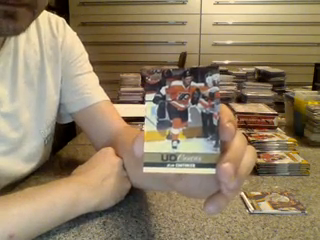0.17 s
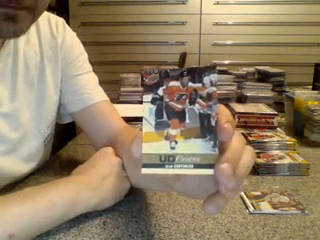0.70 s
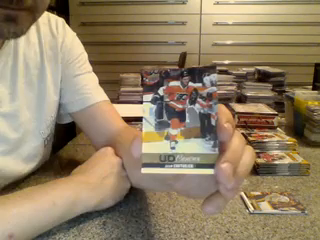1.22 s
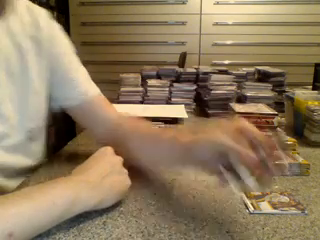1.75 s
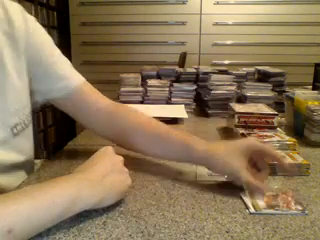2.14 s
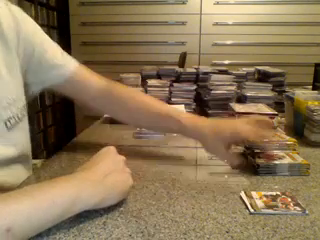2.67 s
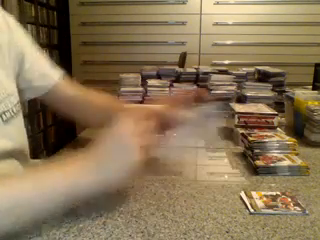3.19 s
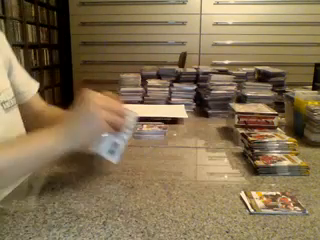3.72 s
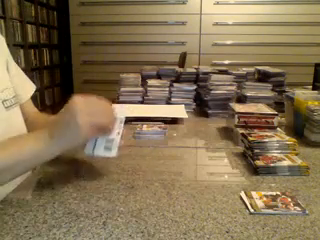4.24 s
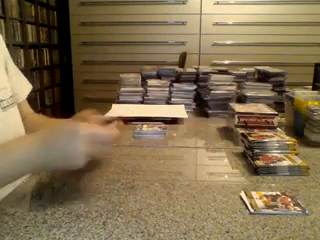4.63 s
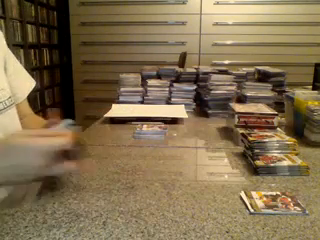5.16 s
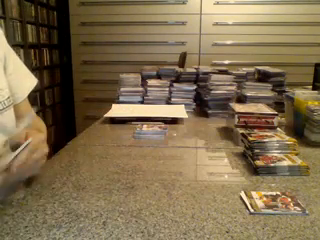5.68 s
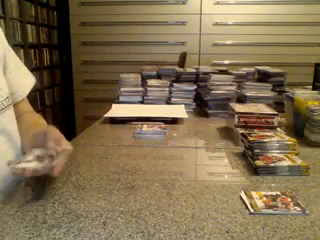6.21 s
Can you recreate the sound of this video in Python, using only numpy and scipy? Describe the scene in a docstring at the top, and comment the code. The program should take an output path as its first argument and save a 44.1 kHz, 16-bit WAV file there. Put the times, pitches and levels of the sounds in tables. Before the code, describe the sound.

A quiet hum runs throughout. Soft contacts of fingers and card, a barely audible cloth swish and a light low landing on a stack lead into plastic sleeve handling: sparse clicks, growing crackle, one strong pop, a cluster of crisp snaps, then softer sliding, a muted bump and last crinkles. Small room with short echoes, simple microphone with little extreme treble.

```python
"""Small room, fan humming steadily: a card is laid down, a thin plastic sleeve is pried open, the card slid in.
Film: filtered noise bursts for the sharp snaps, random short pings over a hiss for the crackling rustle.
Fingers and card: decaying sines and noise scuffs; the landing adds a low ring and a noise crack.
Arm: filtered noise swishes. Fan: sines and filtered noise. Separately, a faint airy band of noise fades early.
Random echoes answer the handling; a steep low-pass ends the chain."""
import sys
import numpy as np
from scipy import signal
from scipy.fft import rfft, irfft, next_fast_len
from scipy.io import wavfile
from scipy.ndimage import uniform_filter1d, map_coordinates

SR = 44100
rng = np.random.default_rng(int(sys.argv[2]) if len(sys.argv) > 2 else 0)


def file_out(sig):
    """Save sig as 16-bit WAV at sys.argv[1]."""
    # one column per channel
    cols = np.atleast_2d(sig).T
    # limit, then scale
    lim = np.clip(cols, -1, 1)
    pcm = np.round(lim * 32767).astype(np.int16)
    wavfile.write(sys.argv[1], SR, pcm)


N = 280917

# All levels are relative unless marked rms.
# fan air colour: (frequency [Hz], gain [dB])
FAN_AIR = [(40, -7.5), (120, 2.5), (220, -4), (400, -9.5), (700, -9), (1200, -6), (2000, -16.5),
           (2500, -15), (3000, -21.5), (6500, -26.5)]
HUM_HZ, HUM_RMS_DB = 90.1, -47
BLADE_HZ = 160.4
# blade tone and its overtones, in order: (level [dB rms])
BLADE_RMS_DB = [-68, -81, -81, -77.5, -81, -81]

# soft contacts of fingers and card: (time [s], level [dB], card ring re contact [dB])
KNOCKS = [(0.277, -59, 3.5), (0.605, -43.5, -2.5), (0.978, -60.5, -1), (1.436, -65.5, 24.5),
          (1.933, -56, -0.5), (2.34, -50.5, -1), (4.889, -45, -8.5), (5.864, -34.5, -8)]
# thud modes of hand and table: (multiple of THUD_HZ [ratio], level [dB], t60 [s])
THUD_MODES = [(.48, -8, 0.14), (1, 2.5, 0.073), (1.35, -15, 0.058)]
THUD_HZ = 273.3
# stiff card modes: (frequency [Hz], level [dB], t60 [s])
CARD_MODES = [(730, -3.5, 0.046), (1290, 3, 0.03), (1587, 6, 0.032)]

# arm reaches out and comes down: (start [s], length [s], level [dB])
SWEEPS = [(1.4, .005, -64.5), (1.493, 0.031, -64), (1.659, 0.14, -61.5), (1.905, 0.048, -72)]
SWEEP_ATTACK_S, SWEEP_RELEASE_S = 0.011, 0.041
# shirt cloth resonances: (centre [Hz], width [Hz], gain [dB])
CLOTH_PEAKS = [(1290, 130, -12), (2534, 430, -2.5), (3500, 550, 0), (5600, 1060, -2)]

# film or card edge buckles: (time [s], level [dB], facet pitch [Hz], focus, sign ignored [dB/octave^2])
SNAPS = [(1.427, -42.5, 2750, 2.5), (2.612, -54.5, 2430, 11), (2.71, -38.5, 3400, 3.5),
         (2.8885, -42.5, 6200, 1), (3.03, -42, 6110, 3.5), (3.172, -40.5, 6110, 8),
         (3.201, -38.5, 3200, 4.5), (3.278, -42, 806, 1.5), (3.327, -37.5, 3500, 4),
         (3.601, -35.5, 3640, 17), (3.637, -38, 3470, 2), (3.7665, -37, 5440, 2), (3.834, -40, 3860, 11),
         (3.9065, -38.5, 5000, 14), (3.9445, -28, 3600, 3.5), (4.0455, -27.5, 5370, 1),
         (4.0695, -28.5, 5100, 1), (4.133, -34.5, 3640, -1), (4.228, -12, 1150, -1), (4.2335, -17, 3150, 3),
         (4.3608, -21, 3140, 8.5), (4.477, -22.5, 1500, -1.5), (4.486, -24.5, 2980, 2.5),
         (4.505, -18, 1300, 3), (4.518, -18.5, 570, 3), (4.5425, -25.5, 2360, 9), (4.706, -26, 3530, 0.5),
         (4.73, -34, 660, -1.5), (4.746, -30, 925, 0), (4.8248, -28.5, 1290, 4.5),
         (4.889, -31.5, 4390, 3.5), (4.8945, -33, 4000, 3.5), (4.97, -34, 980, -1), (5.065, -35.5, 4140, 6),
         (5.102, -38, 4220, 19), (5.126, -37.5, 4370, 1.5), (5.156, -35.5, 1000, -0.5),
         (5.206, -33.5, 3930, 1.5), (5.246, -37, 2800, 3), (5.274, -33.5, 640, 2.5),
         (5.376, -37.5, 2650, 6.5), (5.538, -46, 3600, 10), (5.566, -35, 654, -3.5),
         (5.592, -34.5, 3140, 2.5), (5.649, -40.5, 3480, 1.5), (5.661, -40.5, 3500, 4),
         (5.695, -41, 4950, 1), (5.863, -30, 422, 3), (6.15, -43, 2680, 7), (6.188, -34.5, 2940, 5.5),
         (6.219, -35.5, 2920, 2.5), (6.251, -39.5, 3070, 4.5)]
# colour of the film's snaps and rustle: (frequency [Hz], gain [dB])
FILM_COLOUR = [(170, -42.5), (260, -22), (480, -15), (700, -7.5), (850, -12), (1160, -0.5), (1600, -8.5),
               (4050, -7), (4600, -16.5), (5500, -8), (6500, -20.5)]
# rustle registers, flexing card, sheet body, crisp edge: (low [Hz], high [Hz])
REGISTERS = [(220, 900), (900, 2200), (2200, 7600)]

# card and fingers slide on film: (start [s], length [s], level [dB], card flexing [dB])
STROKES = [(1.437, 0.006, -54.5, -29), (1.471, 0.0023, -56, -7), (2.655, 0.054, -45.5, -32),
           (2.897, 0.011, -53, -16), (3.131, 0.01, -57, -46), (3.2, 0.015, -44.5, -53),
           (3.273, 0.011, -45, -11.5), (3.573, 0.079, -58.5, -23), (3.919, 0.14, -44, -29),
           (4.025, 0.023, -40.5, -28), (4.142, 0.062, -35.5, -29), (4.229, 0.0057, -20.5, -21),
           (4.436, 0.055, -35.5, -8), (4.485, 0.04, -26, -5.5), (4.638, 0.015, -39.5, -18),
           (4.728, 0.024, -31, -5), (4.876, 0.017, -46, 1.5), (5.178, 0.094, -39, -5),
           (5.39, 0.035, -51, -1), (5.565, 0.044, -48, -1.5), (5.681, 0.08, -47.5, -8.5),
           (5.849, 0.031, -48, -4), (6.21, 0.014, -51.5, -7)]
STROKE_ATTACK_S, STROKE_RELEASE_S = 0.0079, 0.019
# firmness of the held sleeve: (time [s], rustle level [dB])
HOLD = [(2.621, -66.5), (2.799, -58.5), (3.101, -66.5), (3.33, -60.5), (3.52, -73), (3.661, -56),
        (3.881, -59), (4.051, -49), (4.621, -48), (5.051, -51.5), (5.51, -58), (5.72, -62.5), (6.02, -70.5),
        (6.14, -54), (6.36, -61.5)]
HOLD_FLEX_DB = -11.5
# small facets give way at random while the film is rubbed
TICKS_PER_S, TICK_RE_RUB_DB, TICK_SPREAD_DB = 33, 5, 1.5
TICK_LIMIT_DB = -47.5  # before the spread
TICK_HZ, TICK_SPREAD_OCTAVES, TICK_FOCUS_DB_PER_OCTAVE2 = 3600, 0.65, 4

LANDING_S, LANDING_RISE_S = 2.1858, 0.018
# low ring of the landing: (level [dB], frequency [Hz], t60 [s])
LANDING_RING = (-44.5, 190, 0.18)
# stack resonances in the clack: (centre [Hz], width [Hz], gain [dB])
STACK_PEAKS = [(650, 190, -1.5), (1141, 320, -0.5), (2070, 240, -1.5), (3240, 960, -13.5),
               (5870, 910, -12.5)]

# room decay: (frequency [Hz], t60 [s])
ROOM_DECAY = [(200, 0.4), (600, 0.18), (1500, 0.28), (6000, 0.18)]
MIC_TOP_HZ = 6600


def amp(db):
    """Decibels to gain."""
    return 10 ** (np.asarray(db) / 20)


def unit(x):
    """x scaled to rms 1."""
    return x / np.sqrt(np.mean(x ** 2) + 1e-20)


def along(points, hz):
    """Interpolate (Hz, value) points on a log frequency axis."""
    f, v = np.transpose(points)
    return np.interp(np.log(hz + 1), np.log(f + 1), v)


def peaks(rows, hz):
    """Summed gain of resonances (centre Hz, width Hz, dB)."""
    return sum(amp(db) / (1 + (2 * (hz - centre) / width) ** 2) for centre, width, db in rows)


def wobble(knots_per_s):
    """Smooth random curve through normal random knots."""
    knots = rng.standard_normal(int(N * knots_per_s / SR) + 4)
    return map_coordinates(knots, [np.arange(N) * knots_per_s / SR])


def coloured(x, gain):
    """Filter x by gain(hz), minimum phase through the folded cepstrum."""
    size = 2 * next_fast_len(len(x) // 2 + 2048)
    log_gain = np.log(np.maximum(gain(np.fft.rfftfreq(size, 1 / SR)), 1e-6))
    cepstrum = irfft(log_gain)
    cepstrum[1:size // 2] *= 2
    cepstrum[size // 2 + 1:] = 0
    return irfft(rfft(x, size) * np.exp(rfft(cepstrum)))[:len(x)]


def add(track, s, sound):
    """Mix sound into track at s seconds."""
    part = track[round(s * SR):][:len(sound)]
    part += sound[:len(part)]


def swell(s, length_s, attack_s, release_s):
    """Gain of one movement: rises until s, holds for its length, dies away."""
    t = np.arange(N) / SR - s
    return np.exp(np.minimum(t, 0) / attack_s - np.maximum(t - length_s, 0) / release_s)


def shifting(x, patchy_db=3):
    """Bending sheets keep changing resonances: x with time-frequency patches of random gain, rms 1."""
    z = signal.stft(x, nperseg=512)[2]
    field = uniform_filter1d(rng.standard_normal(z.shape), size=6, axis=0)
    field = uniform_filter1d(field, size=6, axis=1)
    return unit(signal.istft(z * amp(patchy_db * unit(field)), nperseg=512)[1][:N])


def fan(air_rms_db=-70, drift_rad=.05):
    """Steady hum and weak blade tones, as sines of slightly drifting phase, over a soft rush of air noise."""
    # drift_rad is the phase drift at HUM_HZ
    turn = 2 * np.pi * np.arange(N) / SR + drift_rad * wobble(5.4) / HUM_HZ
    lines = [(HUM_HZ, HUM_RMS_DB)]
    lines += [(BLADE_HZ * k, db) for k, db in enumerate(BLADE_RMS_DB, 1)]
    tones = sum(np.sqrt(2) * amp(db) * np.sin(hz * turn) for hz, db in lines)
    air = unit(coloured(rng.standard_normal(N), lambda hz: amp(along(FAN_AIR, hz))))
    return tones + amp(air_rms_db) * air


def airy_band(centre_hz=2540, width_hz=220, level_db=-77, hold_s=0.23, release_s=0.12):
    """Faint airy whistle, a narrow band of noise, heard at first and then fading."""
    band = lambda hz: 1 / np.hypot(1, 2 * (hz - centre_hz) / width_hz)
    air = unit(coloured(rng.standard_normal(N), band))
    return amp(level_db) * swell(0, hold_s, release_s, release_s) * air


def knocks(thud_db=-3, card_db=-6, scuff_t60_s=0.016, scuff_rise_s=0.0093, attack_s=0.0043):
    """Fingertip scuff swells into a soft contact, thuds in hand and table and excites the card's modes."""
    out, t = np.zeros(N), np.arange(SR // 5) / SR
    lead_s = 3 * scuff_rise_s  # scuff starts this long before contact
    mode = lambda hz, db, t60_s: amp(db - 60 * t / t60_s) * np.sin(2 * np.pi * hz * t)
    card = sum(mode(*row) for row in CARD_MODES)
    thud = sum(mode(THUD_HZ * multiple, db, t60_s) for multiple, db, t60_s in THUD_MODES)
    thud *= 1 - np.exp(-t / attack_s)
    rise = np.exp(np.minimum(t - lead_s, 0) / scuff_rise_s)
    scuff_gain = np.minimum(rise, amp(-60 * (t - lead_s) / scuff_t60_s))
    for s, db, ring_db in KNOCKS:
        scuff = rng.standard_normal(len(t)) * scuff_gain
        ring = signal.fftconvolve(card, scuff / np.linalg.norm(scuff))
        add(out, s, amp(db + thud_db) * thud)
        add(out, s - lead_s, amp(db + ring_db + card_db) * ring)
    return out


def swish(flutter_db=1.9, patchy_db=5.0):
    """Shirt cloth brushes as the arm moves: resonant noise whose colour drifts with the folds."""
    motion = sum(amp(db) * swell(s, length_s, SWEEP_ATTACK_S, SWEEP_RELEASE_S)
                 for s, length_s, db in SWEEPS)
    cloth = unit(coloured(rng.standard_normal(N), lambda hz: peaks(CLOTH_PEAKS, hz)))
    return motion * amp(flutter_db * wobble(51.0)) * shifting(cloth, patchy_db)


def snaps(rows, crack_t60_s=0.012, ring_db=5, ring_sharpness=6, flutter_db=-21, flutter_t60_s=0.093,
          attack_s=0.00023, level_db=-2.44):
    """Film facet pops through: a noise crack peaked at its own pitch, then the sheet flutters."""
    out, t = np.zeros(N), np.arange(SR // 12) / SR
    decay = amp(-60 * t / crack_t60_s) + amp(flutter_db - 60 * t / flutter_t60_s)
    envelope = decay * (1 - np.exp(-t / attack_s))
    for s, db, facet_hz, focus_db in rows:
        # small facets radiate treble, large ones the middle
        octaves = lambda hz: np.log2((hz + 1) / facet_hz)
        peak_db = lambda hz: ring_db / (1 + (ring_sharpness * octaves(hz)) ** 2)
        facet_gain_db = lambda hz: peak_db(hz) - abs(focus_db) * octaves(hz) ** 2
        gain = lambda hz: amp(along(FILM_COLOUR, hz) + facet_gain_db(hz)) * microphone(hz)
        snap = coloured(rng.standard_normal(len(t)) * envelope, gain)
        onset_rms = np.std(snap[:round(.006 * SR)])
        add(out, s, amp(db + level_db) * snap / onset_rms)
    return out


def handling():
    """Strokes add in power to the held sleeve's rustle; returns level and power-weighted card flexing, dB."""
    hold_db = np.interp(np.arange(N) / SR, *np.transpose(HOLD), left=-140)
    power = amp(hold_db) ** 2
    flexing = HOLD_FLEX_DB * power
    for s, length_s, db, flex_db in STROKES:
        stroke = (amp(db) * swell(s, length_s, STROKE_ATTACK_S, STROKE_RELEASE_S)) ** 2
        power = power + stroke
        flexing = flexing + flex_db * stroke
    return 10 * np.log10(power), flexing / power


def creases(per_s, spread_db, life_cycles):
    """Countless tiny creases, each a short ping of random pitch and size; rms 1."""
    chance = rng.random((int(per_s * N / SR), 3))
    start = (chance[:, :1] * N).astype(int)
    hz = 350 * (7000 / 350) ** np.sqrt(chance[:, 1:2])
    size = amp(spread_db * np.minimum(-np.log(1 - chance[:, 2:]), 2.5))
    age = np.arange(SR // 90)
    cycles = hz * age / SR
    decay = amp(-60 * cycles / life_cycles)  # -60 dB after life_cycles
    pings = size * np.sqrt(hz) * np.sin(2 * np.pi * cycles) * decay
    return unit(np.bincount((start + age).ravel(), pings.ravel(), N)[:N])


def sleeve(x, low_hz, high_hz):
    """What one register of the sleeve radiates when x shakes it, rms 1."""
    band = lambda hz: 1 / np.sqrt((1 + (low_hz / (hz + 1)) ** 8) * (1 + (hz / high_hz) ** 8))
    return unit(coloured(x, lambda hz: amp(along(FILM_COLOUR, hz)) * band(hz)))


def rustle(level_db, flex_db, creases_per_s=300, spread_db=4.0, life_cycles=5, friction=0.77, grip_db=3.5,
           card_db=-4.0, body_db=-5.0, edge_db=-6.5, darken=0.13, touch_db=-66, firm_db=-46):
    """Creases let go at random over the hiss of card sliding on film; the grip tightens and eases."""
    # a light touch only hisses, a firm one crackles
    pressure = np.interp(level_db, [touch_db, firm_db], [0, 1])
    crackle = pressure * creases(creases_per_s, spread_db, life_cycles)
    hiss = friction * shifting(rng.standard_normal(N))
    drive = (crackle + hiss) / np.hypot(pressure, friction)
    # the more the stiff card flexes, the lower the sound sits
    register_db = (card_db + flex_db, body_db + darken * flex_db, edge_db - darken * flex_db / 2)
    out = np.zeros(N)
    for db, (low_hz, high_hz) in zip(register_db, REGISTERS):
        out += amp(level_db + db + grip_db * wobble(50)) * sleeve(drive, low_hz, high_hz)
    return out


def ticks(level_db, silent_db=-66, count=260):
    """Rows for snaps(): small facets popping at random times while the film is rubbed."""
    chance, scatter = rng.random((count, 2)), rng.standard_normal((count, 2))
    s = chance[:, 0] * N / SR
    rub_db = level_db[(chance[:, 0] * N).astype(int)]
    db = np.minimum(rub_db + TICK_RE_RUB_DB, TICK_LIMIT_DB) + TICK_SPREAD_DB * scatter[:, 0]
    hz = TICK_HZ * 2 ** (TICK_SPREAD_OCTAVES * scatter[:, 1])
    heard = (chance[:, 1] < TICKS_PER_S * N / SR / count) & (rub_db > silent_db)
    return [(*row, TICK_FOCUS_DB_PER_OCTAVE2) for row in zip(s[heard], db[heard], hz[heard])]


def thump():
    """Stack and table ring low when the card lands: one decaying sine."""
    db, hz, t60_s = LANDING_RING
    t = np.maximum(np.arange(N) / SR - LANDING_S, 0)
    return amp(db - 60 * t / t60_s) * (1 - np.exp(-t / LANDING_RISE_S)) * np.sin(2 * np.pi * hz * t)


def clack(level_db=-42, crack_t60_s=0.013, scuff_db=-15, scuff_t60_s=0.15):
    """Card edge strikes the stack with a dry noise crack and scuffs to rest."""
    out, t = np.zeros(N), np.arange(SR // 8) / SR
    decay = amp(-60 * t / crack_t60_s) + amp(scuff_db - 60 * t / scuff_t60_s)
    sound = coloured(rng.standard_normal(len(t)) * decay, lambda hz: peaks(STACK_PEAKS, hz))
    onset_rms = np.std(sound[t < crack_t60_s / 2])
    add(out, LANDING_S, amp(level_db) * sound / onset_rms)
    return out


def echoes(early_db=-10, early_t60_s=0.065, tail_db=-6.0, build_up_s=0.0026, slap_s=.008, slap_db=-11):
    """Table top and near shelves echo first, then the walls ring out as decaying noise."""
    hz, t, z = signal.stft(rng.standard_normal(SR // 3), SR, nperseg=256)
    decay = amp(-60 * t / along(ROOM_DECAY, hz)[:, None])
    tail = signal.istft(z * decay, SR, nperseg=256)[1]
    tail = tail * (1 - np.exp(-np.arange(len(tail)) / SR / build_up_s))
    early = np.zeros(len(tail))
    for delay_s in rng.uniform(.002, .022, size=16):
        add(early, delay_s, rng.choice([-1, 1], 1) * amp(-60 * delay_s / early_t60_s))
    answer = amp(early_db) * early / np.linalg.norm(early)
    answer += amp(tail_db) * tail / np.linalg.norm(tail)
    # one near surface answers distinctly
    add(answer, slap_s + rng.normal(0, .0003), amp([slap_db]))
    return answer


def room(x):
    """Hands keep moving, so overlapping windowed pieces each get a new echo pattern, added to the direct x."""
    out, hop = x.copy(), SR // 7
    for start in range(0, N, hop):
        piece = x[start:start + 2 * hop]
        windowed = piece * np.hanning(2 * hop)[:len(piece)]
        add(out, start / SR, signal.fftconvolve(windowed, echoes()))
    return out


def microphone(hz):
    """Small microphone's gain: a steep fall above MIC_TOP_HZ."""
    return 1 / np.sqrt(1 + (hz / MIC_TOP_HZ) ** 64)


def scene():
    """Handling in the room, plus the landing's low ring, fan and airy band without echoes."""
    level_db, flex_db = handling()
    background = fan() + airy_band()
    film = rustle(level_db, flex_db) + snaps(SNAPS) + snaps(ticks(level_db))
    contacts = knocks() + swish() + clack()
    return (room(film + contacts) + thump() + background)[None]


def record(dry):
    """Pass each channel through the microphone's low-pass."""
    return np.array([coloured(x, microphone) for x in dry])


dry = scene()
out = record(dry)
file_out(out)
```